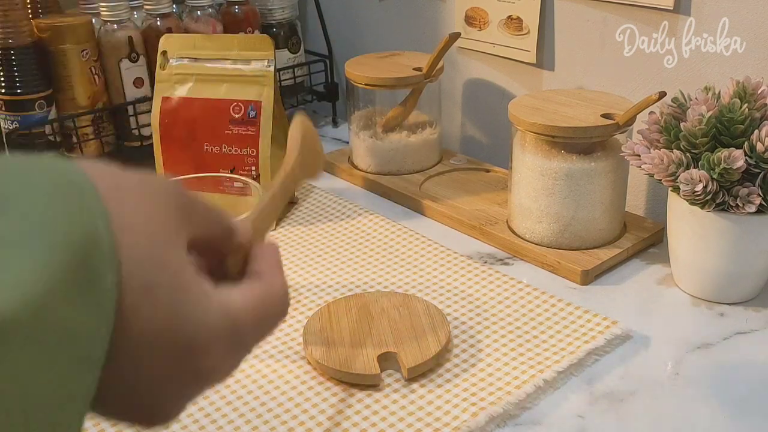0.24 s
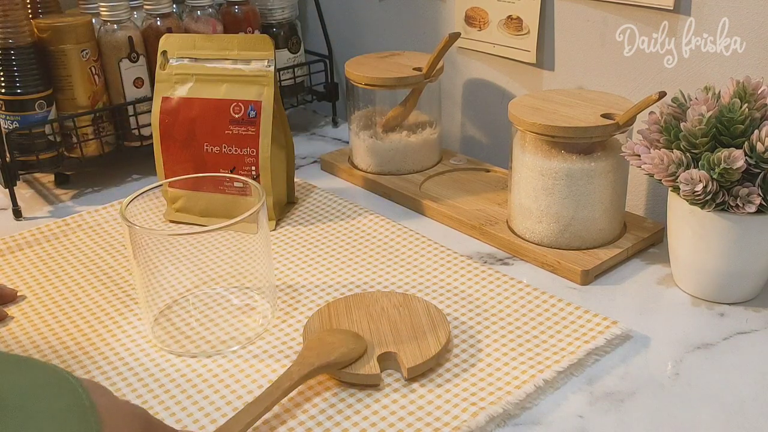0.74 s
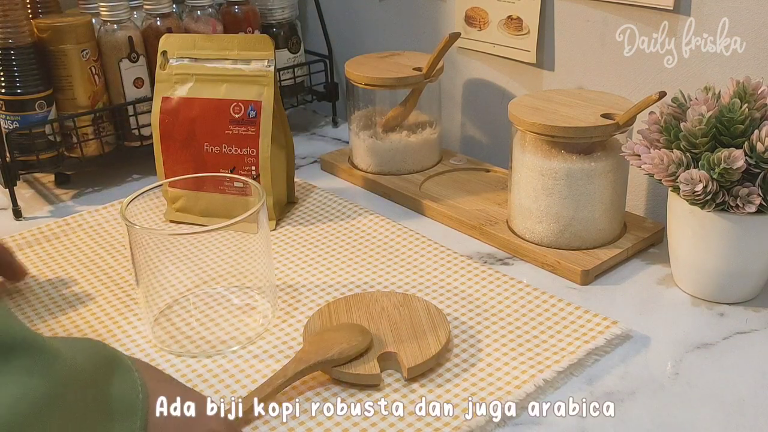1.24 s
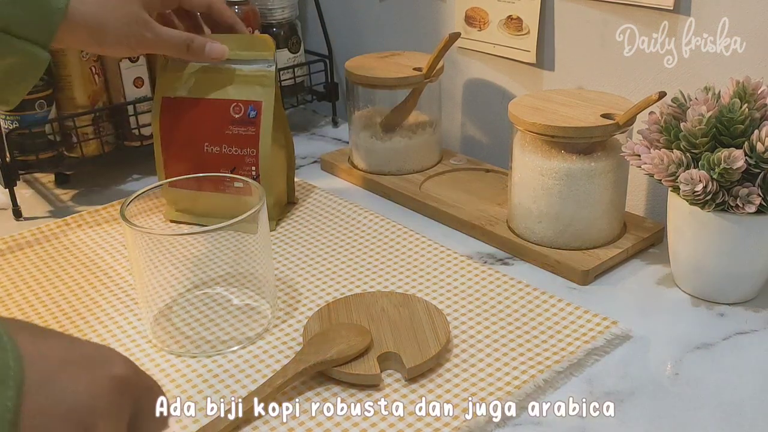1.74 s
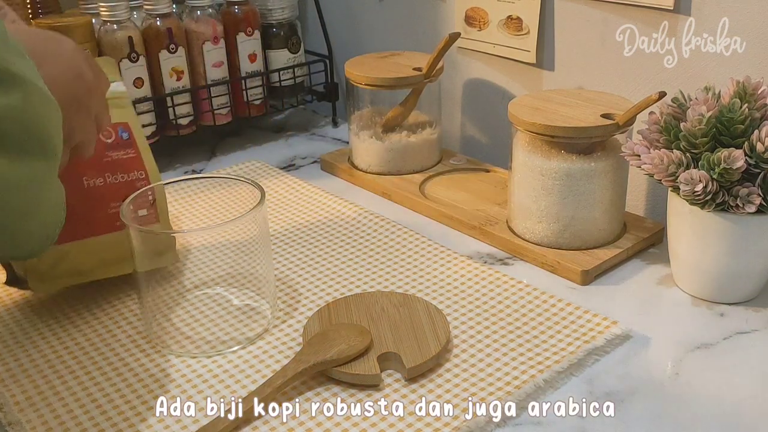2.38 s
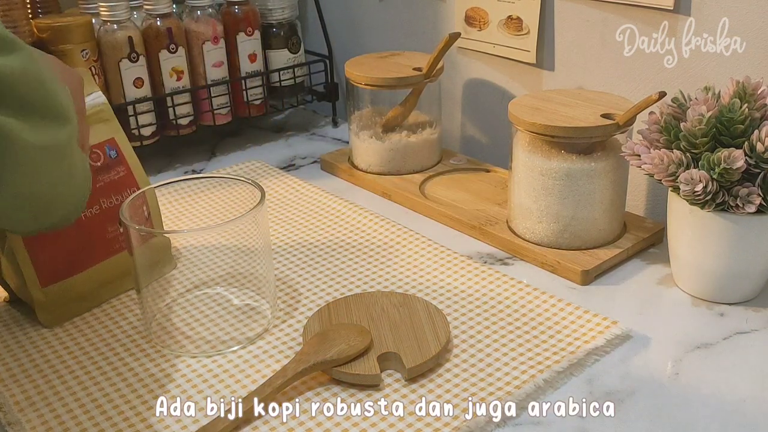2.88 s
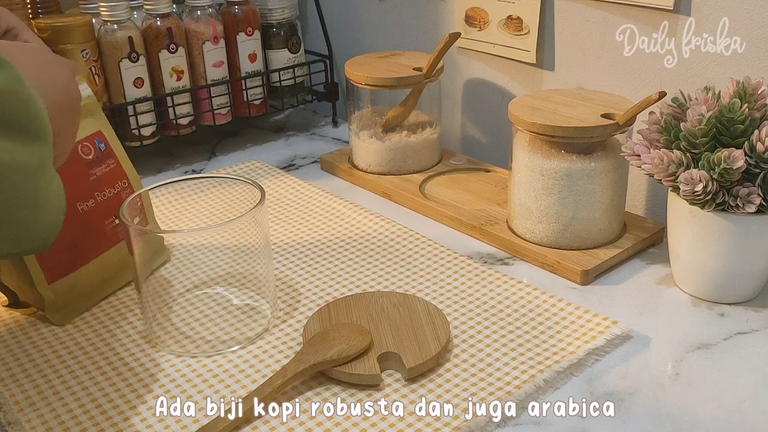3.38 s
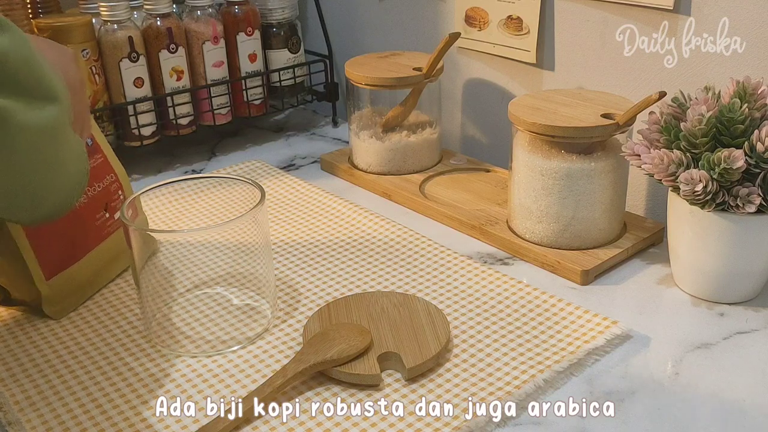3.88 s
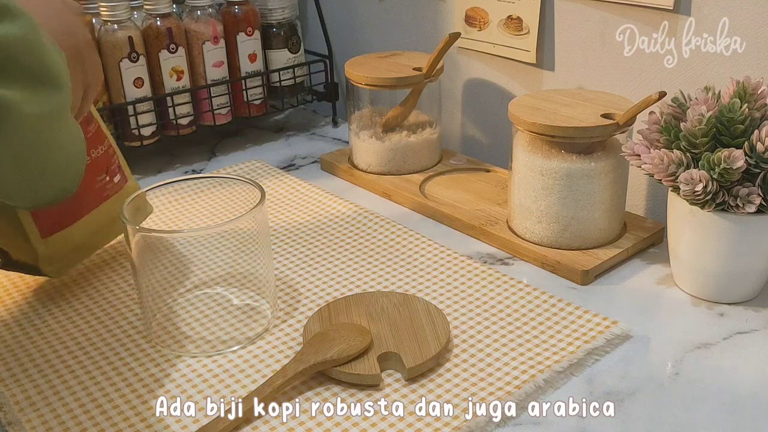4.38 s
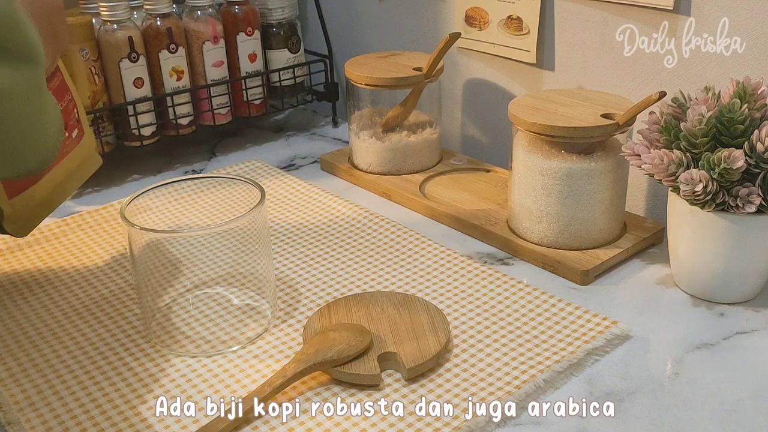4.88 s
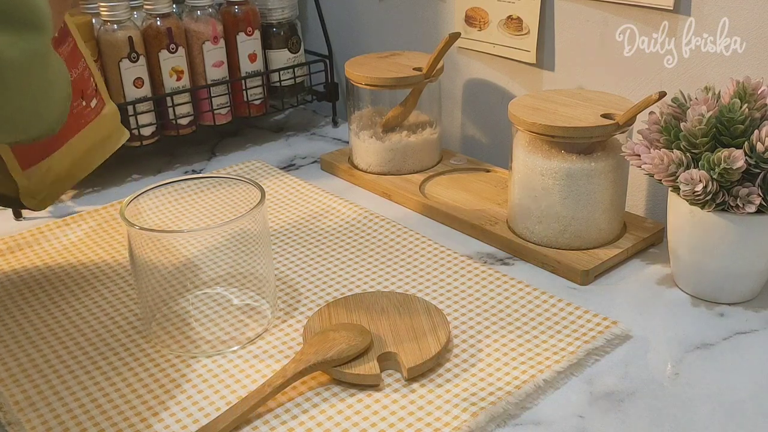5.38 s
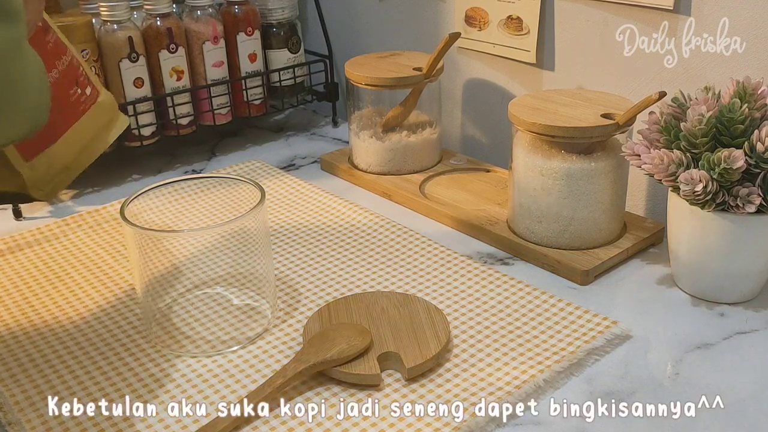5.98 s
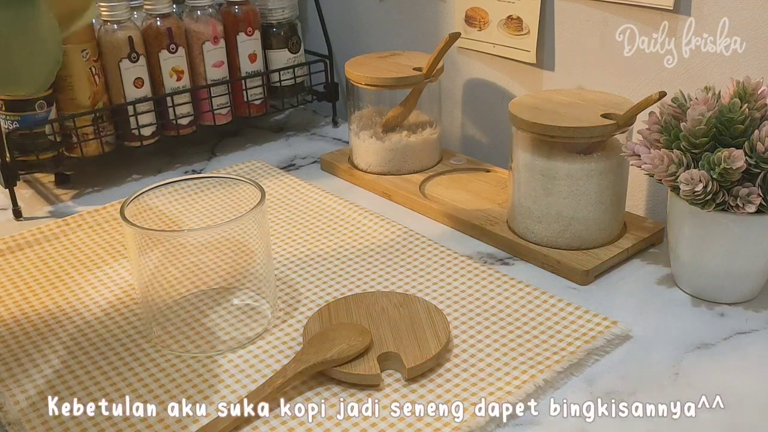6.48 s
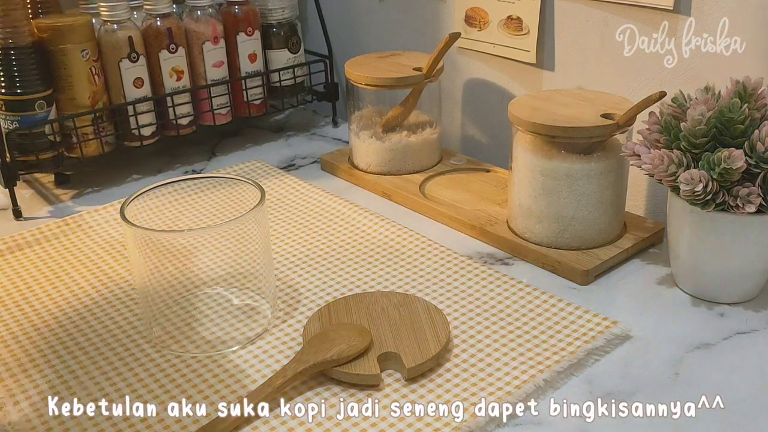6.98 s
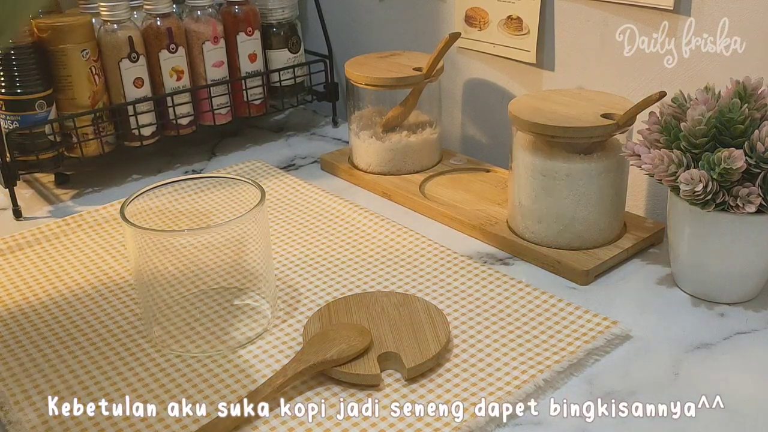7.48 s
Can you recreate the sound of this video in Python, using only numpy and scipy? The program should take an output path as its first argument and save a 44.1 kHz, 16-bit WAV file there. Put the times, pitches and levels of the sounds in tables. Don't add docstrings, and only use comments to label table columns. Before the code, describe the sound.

A quiet tiled kitchen, heard close in stereo, with low appliance rumble and soft microphone hiss throughout. Very faint rustle at the start; at 0.6 s a wooden spoon lands on a wooden lid with a hard, bright, dry clack. At 1.25 s the lid gives a tiny dull tick. From 1.6 s hands take a stiff foil-lined bag of coffee beans: light crackle and dents, then a crisp crease at 2.5 s with beans knocking. Softer turning follows until 3.4 s, when the sharpest, loudest snap and foil ping burst out with finger scrapes. More cracks come at 3.8 and 4.2 s. A dense cluster of snaps, peeling seams and bean knocks peaks at 4.9-5.1 s, with a small ping at 5.4 s. It calms; low counter bumps arrive around 6.1-6.6 s. Light crackles, pings and scrapes return from 7.2 to 7.7 s. Snaps ring briefly off tiles.

```python
import sys
import numpy as np
from scipy import signal
from scipy.fft import rfft, irfft
from scipy.io import wavfile
from scipy.ndimage import uniform_filter1d, minimum_filter1d

SR = 44100
rng = np.random.default_rng(int(sys.argv[2]) if len(sys.argv) > 2 else 0)


def voltage_ratio(level):
    return 10 ** (np.asarray(level, float) / 20)


def transcribe(signal):
    frames = np.atleast_2d(signal).T
    limited = np.clip(frames, -1, 1)
    pcm = np.round(limited * 32767).astype(np.int16)
    wavfile.write(sys.argv[1], SR, pcm)


N = 341334
PORT_LAG = 10


def evened(x):
    return x / np.sqrt(np.mean(x ** 2) + 1e-20)


def peaked(x):
    return x / (abs(x).max() + 1e-20)


def read(points, hz):
    f, value = np.transpose(points)
    return np.interp(np.log(hz + 1), np.log(f + 1), value)


def add(mix, s, sound):
    part = mix[round(s * SR):][:len(sound)]
    part += sound[:len(part)]


def resonate(x, hz, width):
    r = np.exp(-np.pi * width / SR)
    return 2 * signal.lfilter([1 - r], [1, -r * np.exp(2j * np.pi * hz / SR)], x).real


def resonate_twice(x, hz, width):
    return resonate(resonate(x, hz, width), hz, width)


def coloured(x, points):
    hz = np.fft.rfftfreq(x.shape[-1], 1 / SR)
    return evened(irfft(rfft(x) * voltage_ratio(read(points, hz)), x.shape[-1]))


def swells(s, rise_s, fall_s, db):
    step = 32
    fade_db = 20
    t = np.arange(0, N + step, step)[:, None] / SR - s
    gain = voltage_ratio(db - fade_db * np.maximum(-t / np.abs(rise_s), t / np.abs(fall_s)))
    return np.interp(np.arange(N), np.arange(0, N + step, step), np.sqrt((gain ** 2).sum(axis=1)))


# (frequency [Hz], correlation [-1 to 1])
AIR_LIKENESS = [(60, .99), (140, .96), (220, .8), (550, .35), (1650, .06), (4970, -.19), (15000, .19)]
# (frequency [Hz], level [dB per Hz])
HISS = [(150, -12.5), (260, -5.5), (392, -1.5), (582, -3), (877, -5), (1260, -6.5), (2720, -10),
        (6190, -12), (9500, -12), (12500, -22.5), (15600, -17)]
# (frequency [Hz], level [dB per Hz])
RUMBLE_HUM = [(13, -13.5), (22, -14), (27, -4), (54, 3), (70, -13.5), (112, -4), (129, 3.5), (144, -7.5),
              (157, -23), (183, -6.5), (227, -10), (260, -20.5), (340, -48), (570, -120)]
HISS_DB, RUMBLE_DB = -62.5, -66


def air():
    same = np.clip(read(AIR_LIKENESS, np.fft.rfftfreq(N, 1 / SR)), -1, 1)
    a, b = rfft(rng.standard_normal((2, N)))
    pair = irfft([a, same * a + np.sqrt(1 - same ** 2) * b], N)
    return voltage_ratio(HISS_DB) * coloured(pair, HISS) + voltage_ratio(RUMBLE_DB) * coloured(pair, RUMBLE_HUM)


# (time [s], rise [s], fall [s], level [dB])
COUNTER_SWAYS = [
    (6.32, 0.29, 0.32, -55.5),
    (6.56, 0.055, 0.27, -62.5),
]
# (time [s], fall [s], level [dB])
COUNTER_KNOCKS = [
    (6.132, 0.3, -53),
    (6.442, .04, -60),
    (6.515, 0.39, -58),
]
KNOCK_RISE_S = 0.04


def bump():
    s, fall_s, db = np.transpose(COUNTER_KNOCKS)
    sway = swells(*np.transpose(COUNTER_SWAYS))
    knock = swells(s, KNOCK_RISE_S, fall_s, db)
    a, b = rng.standard_normal((2, N))
    deep = evened(resonate(resonate(a, 36, 24), 33, 24))
    boxy = evened(resonate(resonate(b, 113.0, 23), 105.0, 25))
    return sway * deep + knock * boxy


# (frequency [Hz], t60 [s])
KITCHEN_DECAY = [(200, 0.23), (700, 0.25), (2000, 0.35), (5000, 0.28), (10000, 0.27), (16000, 0.19)]
# (frequency [Hz], level [dB])
KITCHEN_COLOUR = [(200, 0.5), (1000, 2.5), (3000, 4), (9500, 6.5), (11500, 5), (14000, -5), (16000, 9)]
# (delay [s], level [dB])
NEAR_SURFACES = [(.0007, -12), (.0017, -13), (.0028, -17), (.0041, -19), (.0098, -11), (.0114, -13),
                 (.0150, -14), (.0228, -13)]
BUILD_S, KITCHEN_DB = .011, 2.5


def echoes():
    t = np.arange(SR // 2) / SR
    taps = rng.standard_normal((2, len(t)))
    taps *= abs(taps) / np.sqrt(3)
    taps *= (1 - np.exp(-(t / BUILD_S) ** 2)) * voltage_ratio(KITCHEN_DB) / np.sqrt(SR / 38)
    for (delay, db), (skew, sign) in zip(NEAR_SURFACES, rng.uniform(-0.43, 1, (len(NEAR_SURFACES), 2))):
        left = round(delay * SR)
        right = round(delay * SR + PORT_LAG * (skew + .5))
        taps[[0, 1], [left, right]] += voltage_ratio(db) * np.sign(sign)
    hz, frames, z = signal.stft(taps, SR, nperseg=128)
    z = z * voltage_ratio(read(KITCHEN_COLOUR, hz)[:, None] - 60 * frames / read(KITCHEN_DECAY, hz)[:, None])
    return signal.istft(z, SR, nperseg=128)[1]


def kitchen(x, patterns):
    turn = 2 * np.pi * 1.3 * np.arange(N) / SR
    wet = 0
    for share, taps in zip((np.cos(turn), np.sin(turn)), patterns):
        wet = wet + signal.fftconvolve((x * share)[None], taps, axes=1)[:, :N]
    return wet


def wood(modes, s, db, again_s, again_db):
    t, out = np.arange(2000) / SR, np.zeros(N)
    ring = peaked(sum(voltage_ratio(d - 60 * t / t60) * np.sin(2 * np.pi * hz * t) for hz, d, t60 in modes))
    small = signal.butter(4, 1150, "high", fs=SR, output="sos")
    ring = signal.sosfilt(small, ring)
    add(out, s, voltage_ratio(db) * ring)
    add(out, s + again_s, voltage_ratio(db + again_db) * ring)
    return out


# (frequency [Hz], level [dB], t60 [s])
SPOON_MODES = [(1510, 3, 0.0064), (2600, -10, 0.004), (3780, 14, 0.0069), (3350, 1, 0.006),
               (5170, 5, 0.0079), (5210, 20, 0.009), (6500, 15, 0.0026), (6820, 18.5, 0.0052),
               (8200, 18, 0.0031), (9650, 18.5, 0.0086), (9600, 4, 0.0071), (11300, -14, 0.0033),
               (12800, 11, .005), (14800, -24, .004)]
# (frequency [Hz], level [dB], t60 [s])
LID_MODES = [(990, -2, 0.0039), (1990, -8, 0.0016), (3060, 5, 0.022), (3520, -7, 0.006)]


def spoon():
    landing = wood(SPOON_MODES, .6174, -11.5, again_s=.0011, again_db=-4)
    tick = wood(LID_MODES, 1.2486, -35.5, again_s=0.00117, again_db=8.0)
    return landing, uniform_filter1d(tick, size=7)


def grains(per_s, spread_db, clump_db):
    clumps = evened(uniform_filter1d(rng.standard_normal(N), size=900))
    size_db = spread_db * np.minimum(rng.exponential(1, N), 4) + clump_db * clumps
    size = voltage_ratio(size_db) * rng.standard_normal(N)
    return size * (rng.random(N) < per_s / SR)


# (frequency [Hz], level [dB per Hz])
PAPER_TONE = [(1470, -5), (2500, 2), (2850, -4), (4000, -4), (4670, -5.5), (5800, -0.5), (9210, -1.5),
              (11500, -6.5), (15800, -7)]
# (frequency [Hz], level [dB per Hz])
BEAN_TONE = [(120, -26), (200, -8.5), (659, -3), (726, -5.5), (807, -1.5), (1200, -13.5), (1560, -27),
             (2640, -120)]
# (frequency [Hz], level [dB per Hz])
SCRAPE_TONE = [(400, -14), (750, -2), (1200, -1), (1900, 0), (2700, -4), (4000, -14), (7000, -35)]
# (time [s], fall [s], paper level [dB], bean level [dB])
BAG_SQUEEZES = [(1.655, 0.027, -53, -64), (2.508, 0.11, -55, -40), (2.608, 0.088, -52, -43),
                (3.081, .08, -68, -49.5), (3.36, 0.02, -65, -72), (3.433, 0.099, -40, -34.5),
                (3.78, 0.047, -58, -49.5), (3.831, 0.011, -38, -66), (4.02, 0.23, -78, -56.5),
                (4.71, 0.034, -46, -43), (4.962, 0.039, -34, -40), (5.035, 0.19, -38.5, -40.5),
                (5.09, 0.048, -39, -43), (6.07, 0.038, -69, -49), (7.3, 0.06, -48.5, -54)]
# (time [s], rise [s], fall [s], paper level [dB], bean level [dB])
BAG_TURNS = [(.05, 0.35, 0.44, -61.5, -83), (2.0, 0.15, 0.47, -55, -67), (2.46, 0.4, 0.12, -63, -66),
             (2.8, 0.091, 1, -54, -57), (3.12, 0.34, 0.27, -55, -83), (3.63, 0.5, 0.19, -56, -62),
             (3.89, 0.028, 0.19, -51.5, -57), (4.29, 0.018, 0.34, -57, -56), (4.59, 0.2, 0.054, -57.5, -60),
             (4.87, 0.046, 0.24, -55, -66), (5.0, 0.038, 0.14, -37, -44.5), (5.14, .05, 0.11, -53, -53),
             (5.34, 0.062, 0.065, -49, -58), (5.6, 0.15, 0.12, -49.5, -53.5),
             (6.97, 0.17, 0.35, -58, -69.5), (7.2, 0.15, 0.13, -51.5, -58), (7.4, 0.61, 0.4, -60, -58.5),
             (7.66, 0.12, 0.067, -50.5, -51), (7.61, .05, .06, -55.5, -67)]
# (time [s], rise and fall [s], level [dB])
FINGER_SLIPS = [(.04, 0.062, -72), (1.65, 0.069, -58), (2.8, 0.11, -57), (3.08, .04, -58),
                (3.362, 0.013, -35), (3.43, 0.036, -33.5), (3.62, .12, -56), (3.83, 0.0082, -31),
                (4.26, 0.085, -70), (4.97, 0.051, -47), (5.07, 0.081, -39), (5.3, 0.29, -55),
                (5.392, 0.011, -38), (6.07, 0.14, -59.5), (7.21, 0.058, -47), (7.29, 0.22, -53),
                (7.42, 0.27, -57.5), (7.65, 0.15, -51.5)]
SQUEEZE_RISE_S, SCRAPE_DB = 0.017, -6


def rustle():
    moves = BAG_TURNS + [(s, SQUEEZE_RISE_S, *rest) for s, *rest in BAG_SQUEEZES]
    s, rise_s, fall_s, paper_db, beans_db = np.transpose(moves)
    paper = voltage_ratio(-3.0) * swells(s, rise_s, fall_s, paper_db)
    beans = voltage_ratio(-4.5) * swells(s, rise_s, fall_s, beans_db)
    s, slip_s, slip_db = np.transpose(FINGER_SLIPS)
    slip = voltage_ratio(SCRAPE_DB) * swells(s, slip_s, slip_s, slip_db)
    crackle = paper * coloured(grains(2600, spread_db=0.7, clump_db=3.0), PAPER_TONE)
    scrape = slip * coloured(grains(3000, spread_db=1.0, clump_db=1.5), SCRAPE_TONE)
    knocking = beans * coloured(grains(1100, spread_db=1.5, clump_db=1.0), BEAN_TONE)
    return crackle + scrape + knocking


# (time [s], length [s], level [dB], pitch [Hz], bright edge [dB])
SEAM_TEARS = [(1.61, .011, -55, 7500, -12), (1.6398, 0.0084, -53, 4500, -15), (1.644, .012, -52, 2000, -25),
              (2.6, .006, -40.5, 950, -28), (3.131, 0.0037, -51, 2380, -15),
              (3.352, .004, -40.5, 6000, -11), (3.631, .006, -49.5, 1090, -25),
              (3.414, .006, -46, 6000, -4), (3.43, 0.0046, -31, 7500, -12), (3.768, .02, -49, 2200, -30),
              (3.829, .004, -34.5, 4500, -12), (3.839, .02, -43.5, 2100, -30),
              (4.2234, .004, -42, 4240, -25), (4.704, .005, -52, 3000, -15),
              (4.236, 0.0097, -42.5, 2220, -27), (4.96, 0.0055, -42, 8000, -6),
              (4.964, .004, -36, 7400, -8), (5.0655, 0.0055, -36, 8500, -5),
              (5.0768, 0.0042, -23.5, 7400, -10), (5.087, .009, -31.5, 9100, -10),
              (7.19, 0.0043, -51, 6000, -15), (7.167, .006, -56.5, 890, -25),
              (7.198, 0.0043, -44, 1790, -25), (7.206, .005, -50, 1000, -25), (7.29, .004, -45, 3000, -12),
              (7.295, .004, -44, 1890, -15), (7.306, .007, -56, 2200, -20), (7.58, .004, -56, 2300, -20),
              (7.625, 0.0077, -46, 1690, -25), (7.633, .006, -52, 2500, -23),
              (7.656, 0.0065, -45.5, 2000, -25), (7.662, .004, -48, 7400, -15),
              (7.696, .005, -55, 1740, -25)]
TEAR_SPREAD = 0.67
BRIGHT_HZ = 12700


def tears():
    t, out = np.arange(1000) / SR, np.zeros(N)
    grits = rng.standard_normal((len(SEAM_TEARS), 1000))
    for (s, length, db, hz, edge_db), grit in zip(SEAM_TEARS, grits):
        burst = grit * abs(grit[::-1]) * np.sin(np.pi * np.clip(t / length, 0, 1) ** .5)
        body = resonate_twice(burst, hz, TEAR_SPREAD * hz)
        edge = resonate_twice(burst, BRIGHT_HZ, 5000)
        add(out, s, voltage_ratio(db + 8.5) * (peaked(body) + voltage_ratio(edge_db) * peaked(edge)))
    return out


# (time [s], level [dB], pitch [Hz], t60 [s])
FOIL_PINGS = [(1.6408, -57, 4140, 0.0035), (2.4993, -35, 850, 0.022), (2.6015, -36, 910, 0.0093),
              (3.0795, -40, 774, 0.017), (3.133, -39, 805, 0.013), (2.612, -45, 840, 0.014),
              (2.625, -41, 756, .015), (3.4142, -34, 790, 0.0087), (3.4253, -9.5, 4230, 0.0036),
              (3.4348, -22, 4740, 0.0027), (3.4472, -24, 5430, 0.0043), (3.829, -33, 3940, 0.0024),
              (4.1686, -54, 696, .01), (4.2226, -23, 880, 0.0075), (4.2227, -29.5, 4050, 0.0057),
              (4.2238, -36, 2400, 0.0031), (4.2395, -49, 2330, 0.009), (4.7045, -53, 366, 0.086),
              (4.8066, -32.5, 840, 0.0094), (4.9406, -37, 3070, 0.015), (4.9484, -25, 700, 0.0096),
              (4.9603, -36, 790, 0.011), (4.9605, -26.5, 3100, 0.01), (5.0305, -37, 600, 0.0083),
              (5.0375, -29, 810, 0.0063), (5.066, -34, 4450, 0.01), (5.067, -25, 595, 0.0063),
              (5.0685, -36, 8100, 0.0046), (5.3597, -50, 850, 0.011), (5.388, -29.5, 1830, 0.0084),
              (6.066, -44, 1000, 0.012), (6.351, -37, 940, 0.007), (7.1895, -42, 610, 0.016),
              (7.199, -30, 1310, 0.0038), (7.228, -34, 1400, .004), (7.29, -33, 3140, 0.0047),
              (7.298, -37, 1830, 0.0065), (7.31, -44, 990, .008), (7.65, -46, 1200, 0.0065),
              (7.694, -40, 1740, .006)]
PING_RISE_CYCLES = 1.8


def pings():
    t, out = np.arange(3000) / SR, np.zeros(N)
    for s, db, hz, t60 in FOIL_PINGS:
        swing = voltage_ratio(db - 60 * t / t60) * np.minimum(t * hz / PING_RISE_CYCLES, 1)
        add(out, s, swing * np.sin(2 * np.pi * hz * t) * 2)
    return out


# (frequency [Hz], width [Hz], level [dB])
WALL_MODES = [(147, 150, -30), (209, 84, -3.5), (380, 61, -18), (690, 120, 0.5), (1210, 1600, -13),
              (1780, 810, -7)]
# (time [s], snap level [dB], snap pitch [Hz], fizz over snap [dB], thud over snap [dB])
SHARP_CREASES = [(1.6402, -53.5, 4100, 6, -2.5), (2.499, -32.5, 5130, -9.5, -5.5), (2.6, -46, 2900, -10, 0),
                 (3.131, -44.5, 2440, -11, -7), (3.3517, -32, 4240, -22, -18), (3.4134, -45.5, 4120, 8, 9),
                 (3.4248, -19.5, 4180, -6, -18), (3.629, -48, 3820, -15, -0.5),
                 (3.7659, -38.5, 4020, 3.5, -4), (3.8286, -27, 3600, -15, -15),
                 (4.0138, -42, 3030, -39, -4.5), (4.2222, -38, 3600, -8.5, -1.5),
                 (4.94, -44, 3050, -10, -6), (4.9479, -36, 3120, 1, 0), (4.9601, -42.5, 3140, 12.5, -11),
                 (4.9672, -26.5, 3000, -17, -16.5), (5.0278, -44.5, 3000, -10, 6.5),
                 (5.0371, -36.5, 4300, 0, 3.5), (5.0765, -34, 3880, 4.5, -5), (5.0914, -55, 4640, -3, -19),
                 (5.3594, -46, 3340, -3, 0), (5.3872, -54, 3130, 5, -24), (7.2893, -40, 2820, -7, -10),
                 (7.2974, -46, 2600, -2, -5)]
# (time [s], snap level [dB], thud over snap [dB], panel pitch [Hz])
DULL_DENTS = [(1.6122, -57, 4, 367), (2.2063, -83.5, 18, 307), (2.2685, -60, -1.5, 703),
              (2.451, -54.5, 1.5, 610), (2.4704, -63, 9, 586), (2.776, -61, 4.5, 590),
              (2.8644, -55.5, -2, 720), (2.9216, -51, -10, 571), (3.0799, -64.5, 12.5, 590),
              (4.1684, -71, 18, 590), (4.4221, -57, 0, 557), (4.696, -61, -6, 301), (4.7046, -56, -3, 375),
              (4.7245, -50.5, -10, 794), (4.806, -68, 12, 800), (5.0663, -40.5, 7.5, 400),
              (5.146, -54.5, 4, 353), (5.3138, -53, -4, 830), (5.516, -65, 8.5, 616),
              (6.0652, -51, -4, 354), (6.099, -63.5, 8, 834), (6.352, -65.5, 9.5, 895),
              (7.1399, -62.5, 8.5, 784), (7.1889, -49, 1.5, 724), (7.2045, -63, 6, 890),
              (7.2284, -65, 11, 650), (7.6589, -67, 7, 610)]
CRACK_PANEL_HZ, DENT_HZ, DENT_FIZZ_DB = 836, 3340, 2
FIZZ_HZ, FIZZ_WIDTH, SNAP_WIDTH = 7040, 4340, 3700
BURST_S, FOLD_THINNING = .00055, .55


def snaps():
    t, out = np.arange(1500) / SR, np.zeros(N)
    creases = [(*row, CRACK_PANEL_HZ) for row in SHARP_CREASES]
    creases += [(s, db, DENT_HZ, DENT_FIZZ_DB, thud_db, hz) for s, db, thud_db, hz in DULL_DENTS]
    grits = rng.standard_normal((len(creases), 1500))
    for (s, db, hz, fizz_db, thud_db, thud_hz), grit in zip(creases, grits):
        burst = grit * (t / BURST_S) * np.exp(-t / BURST_S)
        burst[12] += 5.5
        thinned = burst - FOLD_THINNING * np.roll(burst, shift=1)
        snap = resonate_twice(thinned, hz, SNAP_WIDTH)
        fizz = resonate_twice(burst, FIZZ_HZ, FIZZ_WIDTH)
        push = grit[::-1] * np.exp(-t / 0.004)
        push[20] += 3.0
        panel = [(thud_hz, 0.99 * thud_hz, 0)]
        thud = sum(voltage_ratio(d) * resonate(resonate(push, f, w), f, 2 * w) for f, w, d in WALL_MODES + panel)
        crease = peaked(snap) + voltage_ratio(fizz_db) * peaked(fizz) + voltage_ratio(thud_db) * peaked(thud)
        add(out, s + .0004, voltage_ratio(db + 10.5) * crease)
    return out


# (time [s], left over right [dB])
BAG_BALANCE = [
    (1.6, -1.5),
    (2.5, -.4),
    (3.35, -2.5),
    (3.45, -2.5),
    (3.85, -3),
    (4.25, -.6),
    (5.0, -.3),
    (7.3, -0.5),
]
SMALL_HZ = 145
CREASE_ROOM_DB, PING_ROOM_DB, RUSTLE_ROOM_DB, TEAR_ROOM_DB = -1.5, -8, -5, -10


def scene():
    small = signal.butter(2, SMALL_HZ, "high", fs=SR, output="sos")
    creases, foil, handling = signal.sosfilt(small, [snaps(), pings(), rustle()])
    patterns = echoes(), echoes()
    background = bump() + air()
    seams = tears()
    landing, tick = spoon()
    bag = creases + foil + handling + seams
    side = voltage_ratio(np.interp(np.arange(N) / SR, *np.transpose(BAG_BALANCE)) / 2)
    taps = landing * voltage_ratio([[2.2], [-2.2]]) + tick * voltage_ratio([[-1.5], [1.5]])
    left = bag * side + taps[0]
    right = np.roll(bag / side, PORT_LAG) + np.roll(taps[1], PORT_LAG // 2)
    wet = voltage_ratio(CREASE_ROOM_DB) * creases + voltage_ratio(PING_ROOM_DB) * foil
    wet = wet + voltage_ratio(RUSTLE_ROOM_DB) * handling + voltage_ratio(TEAR_ROOM_DB) * seams
    wet = wet + voltage_ratio(-10.0) * landing + voltage_ratio(-17.0) * tick
    return np.array([left, right]) + kitchen(wet, patterns) + background


# (frequency [Hz], threshold [standard deviations])
BAND_RARITY = [(1200, 6), (2500, 2.4), (4000, 1.6), (7500, 1.5), (9500, 1.1), (11500, .6), (16000, .9)]
DROP_BANDS_PER_OCTAVE, DROP_HOLD = 17, 4
GATE_DEPTH_DB, GATE_ATTACK_DB = -45, 7


def gate(x):
    hz, frames, z = signal.stft(x, SR, nperseg=1024, noverlap=768)
    band = (DROP_BANDS_PER_OCTAVE * np.log2(hz + 1)).astype(int)
    chance = rng.standard_normal((len(frames) // DROP_HOLD + 1, band.max() + 1))
    chance = evened(uniform_filter1d(chance, size=3, axis=0))
    chance = chance[np.arange(len(frames)) // DROP_HOLD][:, band].T
    shut = chance > read(BAND_RARITY, hz)[:, None]
    treble_db = 10 * np.log10((abs(z[:, hz > 2000]) ** 2).sum(axis=(0, 1)) + 1e-20)
    jump_db = np.roll(treble_db, -2) - np.roll(treble_db, 2)
    steady = minimum_filter1d(1. * (jump_db < GATE_ATTACK_DB), size=7)
    return signal.istft(z * voltage_ratio(GATE_DEPTH_DB * shut * steady), SR, nperseg=1024, noverlap=768)[1][:, :N]


MASK_HZ, MASK_FALL_DB, MASK_DEPTH_DB = 11200, 9, -40


def mask(x):
    hz, frames, z = signal.stft(x, SR, nperseg=128, noverlap=96)
    level_db = 10 * np.log10((abs(z[:, hz > 3000]) ** 2).sum(axis=(0, 1)) + 1e-20)
    before_db = -minimum_filter1d(-np.roll(level_db, 8), size=9)
    sudden = before_db - np.roll(level_db, 22) > 22
    shut = sudden * (before_db - level_db > MASK_FALL_DB) * (hz > MASK_HZ)[:, None]
    return signal.istft(z * voltage_ratio(MASK_DEPTH_DB * shut), SR, nperseg=128, noverlap=96)[1][:, :N]


def top_cut(x):
    return signal.sosfilt(signal.butter(12, 16790, fs=SR, output="sos"), x)


EDGE_HZ, OFFSET = 15930, .00294


def record(dry):
    edge = signal.firwin(1023, EDGE_HZ, window=("kaiser", 8), fs=SR)
    limited = signal.oaconvolve(mask(gate(dry)), edge[None], "same")
    return top_cut(limited + OFFSET)


dry = scene()
out = record(dry)
transcribe(out)
```